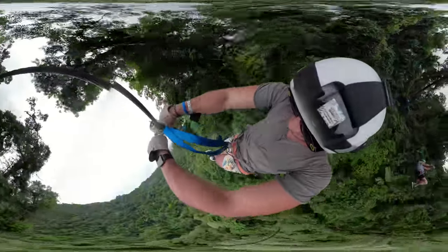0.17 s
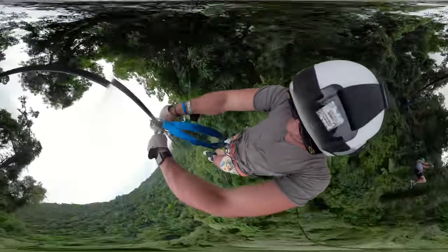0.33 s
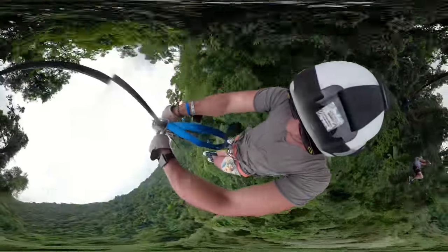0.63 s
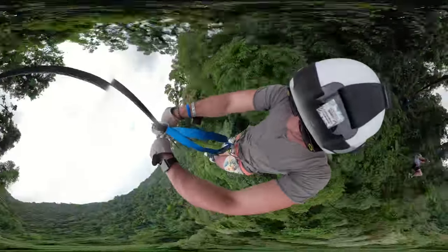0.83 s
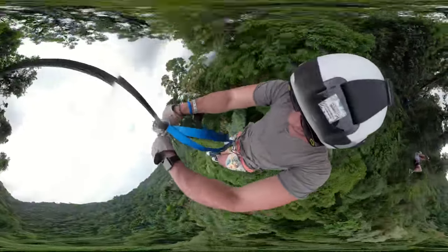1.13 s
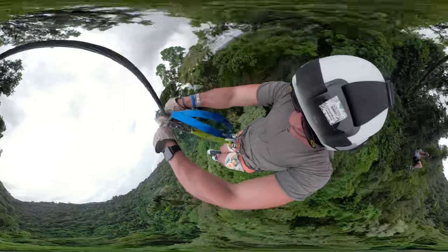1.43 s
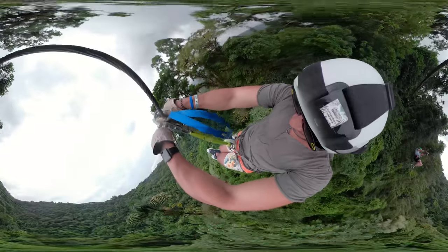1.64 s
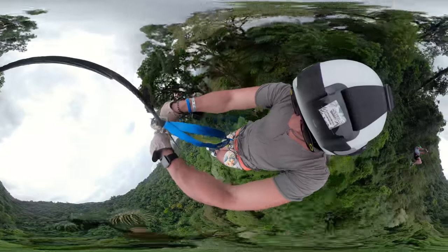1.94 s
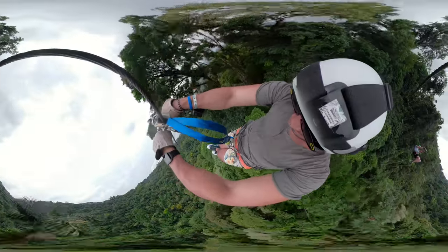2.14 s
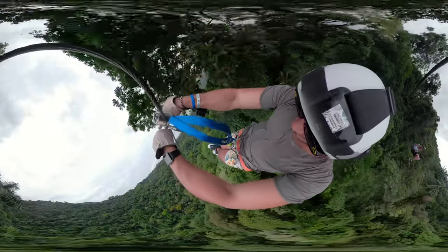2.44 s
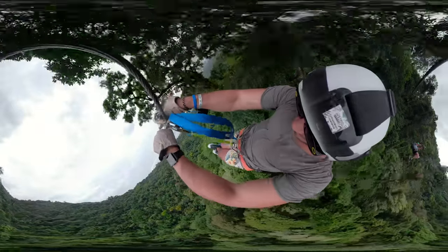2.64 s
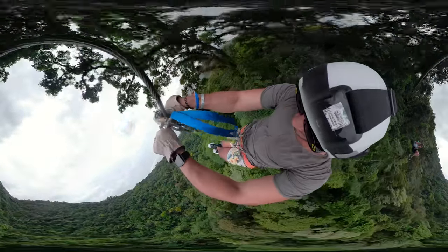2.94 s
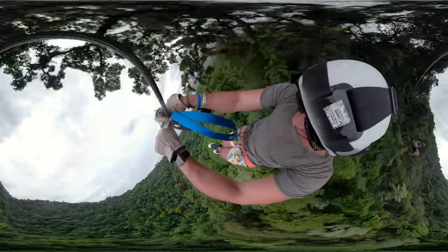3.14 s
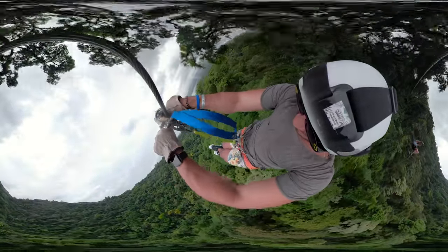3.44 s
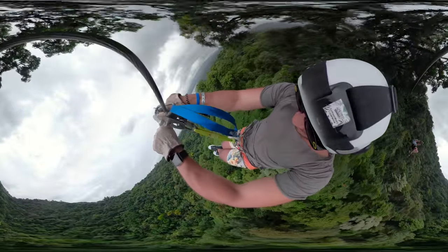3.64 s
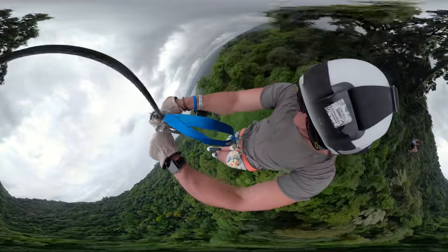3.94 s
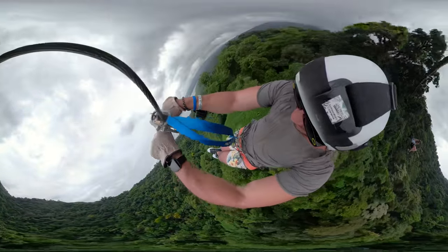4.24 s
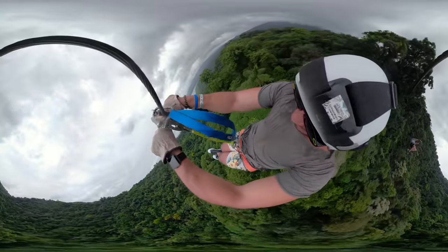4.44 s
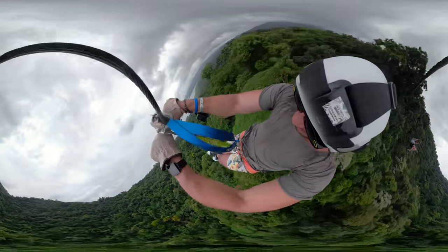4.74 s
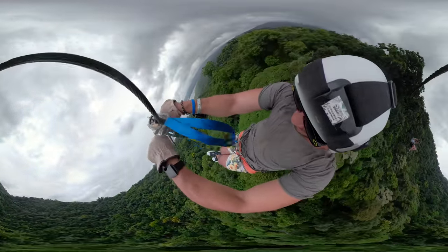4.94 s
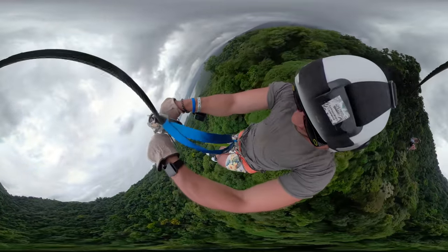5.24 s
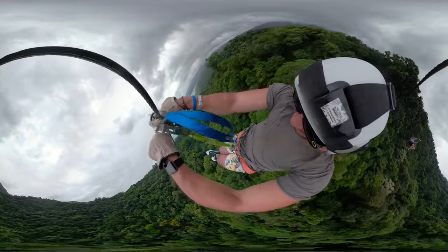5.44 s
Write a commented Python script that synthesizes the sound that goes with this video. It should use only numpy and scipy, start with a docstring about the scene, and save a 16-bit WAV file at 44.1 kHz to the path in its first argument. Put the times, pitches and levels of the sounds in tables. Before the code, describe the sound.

Wind dominates, low and rough, surging in irregular bursts with short popping buffets at the close, exposed microphone. Above it, quieter steel wheels sing on a cable in a grainy, high metallic whir whose tones swell and fade. The whir climbs and becomes a little cleaner and brighter, and a thin whine comes forward in the second half. Open air, no echo.

```python
"""Above a forest, a zip-line trolley gathers speed along a steel cable.
Its sheaves whirr in a rising comb of partials that swell as they cross the trolley's resonances.
Steel rubs with a bright hiss, the sheaves ring high and thin, and the cable's strands whine.
Shaped noise makes the rushing air that rumbles and buffets on the rider's microphone."""
import sys
import numpy as np
from scipy import signal
from scipy.fft import rfft, irfft, next_fast_len
from scipy.io import wavfile
from scipy.ndimage import uniform_filter1d

SR = 44100
rng = np.random.default_rng(int(sys.argv[2]) if len(sys.argv) > 2 else 0)


def digitize_waveform(pressure):
    """Quantize a signal to 16-bit integers and store it at the path in sys.argv[1].

    Rows of a 2-D input are taken as channels; values are limited to [-1, 1].
    """
    field = np.atleast_2d(pressure).T
    bounded = np.clip(field, -1, 1)
    quanta = np.round(bounded * 32767).astype(np.int16)
    wavfile.write(sys.argv[1], SR, quanta)


N = 246499
TIME = np.arange(N) / SR

# the ride, as twists of the cable passed: t/s, rate/Hz
TWIST_RATE = [(0, 95.3), (.8, 107.4), (1.6, 119.0), (2.4, 130.0), (3.2, 140.25), (4.0, 149.7), (4.8, 158.1),
              (5.6, 165.3)]
STRANDS = 6
# how hard the sheaves bear on the cable, as a gain on whirr and hiss: t/s, level/dB
CONTACT = [(0.0, -45), (0.55, -47), (1.1, -44), (1.76, -50), (1.95, -47), (2.47, -47.5), (2.75, -47.5),
           (3.32, -45), (3.62, -45.5), (4.44, -42.5), (4.68, -49.5), (4.7, -45.5), (4.73, -47.5),
           (5.18, -42.5), (5.5, -43.5), (5.55, -45)]

# how far the partials lie above multiples of the twist rate: t/s, offset/share of a step
COMB_OFFSET = [(0, .27), (1, .32), (3.05, .33), (3.3, .23), (4.2, .24), (5.6, .2)]
# stretches of cable that make a group of partials sing (bell widths, out to 1/e):
# t/s, half length/s, centre/partial number, half spread/partials, lift/dB, roughness/0-1
SWELLS = [(.1, 0.14, 21, 3.1, 9.5, 0), (0.11, 0.21, 43.2, 1.9, 2, 0.5), (0.573, 0.063, 29, .6, 11.5, 0),
          (0.794, 0.079, 28.3, 0.73, 9, .02), (0.72, 0.14, 34, 1.2, 7.5, 0.2),
          (0.85, 0.053, 26.2, .4, 8.5, 0), (1.17, 0.16, 25, 0.41, 8.5, 0.1),
          (1.37, 0.24, 26.6, 0.92, 12.5, 0.18), (1.3, 0.33, 21.5, 1.2, 12, 0.15),
          (1.03, 0.31, 49, 1.8, 7.5, 0.7), (1.39, 0.16, 29.4, 1.3, 9.5, 0.3),
          (1.72, 0.17, 32.8, 1.3, 9.5, 0.13), (1.98, 0.31, 19.6, 1.1, 14.5, .12),
          (2.43, .22, 35.7, 2.35, 14.5, 0.54), (2.36, .24, 15, .9, 14, .3),
          (2.655, 0.067, 21, .35, 17, 0.03), (2.8, 0.29, 17.8, 1.77, 16.5, 0.46),
          (2.9, 0.1, 34.3, 1.2, 14, 0.7), (3.006, 0.23, 20.1, 0.59, 14.5, 0),
          (3.19, 0.28, 21.3, 0.97, 10, 0.35), (3.552, .09, 31.9, 1.8, 11.5, .12),
          (3.8, 0.36, 23, 2.3, 5.5, 0.22), (3.854, .05, 19.1, .38, 12, .03),
          (4.197, 0.15, 28, 2.2, 13.5, 0.2), (4.42, .1, 24, 2.67, 6.5, 0.47),
          (4.58, 0.092, 29, 3.9, 12.5, 0.3), (4.7, 0.16, 32.4, 0.85, 9, 0.2),
          (5.285, 0.29, 25, 3.3, 9.5, 0.2), (4.86, 0.25, 23.5, 3.8, 6.5, 0.2)]
FLARE_HZ, FLARE_DB = 5.6, 2.07  # each partial flares and fades by itself: rate, spread
# trolley resonances: f/Hz, width/Hz, gain/dB, scrape gain/dB, gain/dB per doubling of speed
RESONANCES = [(2185, 1160, -12, 7.5, -13.5), (2878, 200, 7.5, -8.5, -11.5), (3088, 456, -2.5, 1.8, -5.5),
              (3580, 660, -2, -14, 0.5), (4365, 790, -1.5, 1.4, -8), (5780, 810, -5, 5, 4.5)]
# narrow rings of the side plates, excited by the scraping: f/Hz, width/Hz, gain/dB
PLATE_RINGS = [(2857, 130, -2.5), (3510, 290, 1.5)]

# colour of the rubbing: f/Hz, level/dB
HISS_COLOUR = [(700, -1.5), (1400, -5.5), (2500, -9), (4500, 3.5), (6300, -0.5), (6800, 0), (7300, -2.5),
               (8000, -6.5), (8750, -11.5), (9550, -10.5), (10000, -22.5), (10900, -21.5), (11800, -29.5),
               (14000, -39)]
HISS_DB, HISS_FLICKER_DB = 7.5, 1  # against the contact level; spread
# the sheave's high ringing: t/s, level/dB
RINGING = [(0.0, -49.5), (0.76, -62), (1.16, -56), (1.61, -77), (1.87, -53), (2.44, -48), (2.63, -51.5),
           (3.48, -47), (3.62, -60), (3.91, -48), (4.02, -60), (4.74, -72), (5.43, -62), (5.55, -59)]
# its modes: f/Hz, width/Hz, level/dB
SHEAVE_MODES = [(9420, 155, 1), (14570, 120, -24)]
# the strands' whine: t/s, level/dB
WHINE = [(0, -49.5), (.9, -55), (1.15, -43), (1.7, -54), (3.5, -60), (4.05, -42), (4.28, -42), (4.38, -48),
         (4.62, -42), (4.68, -51), (4.8, -39.5), (4.95, -47.5), (5.2, -44), (5.59, -46.5)]

# colours of the wind, from large eddies to fine spray, each: f/Hz, level/dB
SURGE_COLOUR = [(12, -21), (25, -4.5), (42, 3.5), (55, 3), (64, -16.5), (85, 8.5)]
RUMBLE_COLOUR = [(45, -23), (62, 2.5), (76, 0.5), (100, -1.5), (130, -5), (165, -12), (210, -19),
                 (300, -31.5), (500, -58)]
TURBULENCE_COLOUR = [(90, -18), (150, 0.5), (210, 3), (260, -4), (320, -6.5), (420, -12.5), (560, -21.5),
                     (800, -32.5), (1500, -48.5)]
SPRAY_COLOUR = [(300, -12), (550, -1.5), (750, -3.5), (1100, -5.5), (1600, -10.5), (3000, -12)]
# big, slow eddies (half length out to 1/e): t/s, half length/s, lift/dB
SURGES = [(.09, .05, 2), (.33, .08, 7), (.86, .09, 4), (1.04, 0.046, 2), (2, 0.043, -0.5), (2.28, .05, 0.5),
          (3.18, .05, 6.5), (3.42, 0.16, 3), (3.78, 0.12, -2)]
# gusts and lulls: t/s, half length/s, turbulence lift/dB, spray lift/dB
GUSTS = [(.44, 0.058, 3.5, 8.5), (.78, 0.049, 6, -2), (1.47, 0.2, 5, 7), (1.72, 0.058, 7.5, -5),
         (1.92, 0.027, -5, 2.5), (2.07, 0.013, 9.5, 11), (2.3, 0.079, 8, 5.5), (2.68, 0.12, 7, 2.5),
         (2.83, .06, -3.5, -10), (3.02, 0.064, 9.5, 4.5), (3.3, 0.17, 5.5, 4), (3.68, 0.14, 6.5, 8),
         (3.91, 0.045, -4.5, 2), (4.05, 0.027, 9.5, 7), (4.2, 0.036, 2, 7.5), (4.38, 0.096, 4, 3.5),
         (4.61, 0.097, 10, 6.5), (4.79, 0.062, -3.5, -4), (5.08, .06, 5, 1), (5.36, 0.038, 10.5, 5),
         (5.52, 0.09, 10.5, 8.5)]
FLUTTER_HZ, FLUTTER_DB = 13.7, 1.62  # quick unsteadiness of the flow: rate, spread
SURGE_DB, RUMBLE_YIELDS = -20.5, 0.53  # between surges; share of their lift the rumble loses
RUMBLE_DB, RUMBLE_FOLLOWS = -16.5, 0.23  # between gusts; share of the turbulence's lift
TURBULENCE_DB, FLOW_DB_PER_DOUBLING = -27.5, 1.5  # between gusts at mean speed; rise with speed
SPRAY_DB = -42  # between gusts at mean speed
# the hardest buffets, as strength of the kick: t/s, level/dB
BUFFETS = [(0.18, -16), (0.303, -9), (0.364, -18), (0.887, -12.5), (2.695, -6), (2.93, -14.5), (3.293, -11),
           (3.591, -11), (3.689, -8.5), (3.814, -10), (4.292, -22), (4.561, -14.5), (4.706, -7),
           (5.236, -22), (5.517, -16)]
# short flaps of air at the port, as strength of the kick: t/s, level/dB
FLAPS = [(0.582, -26.5), (0.837, -29), (1.184, -22), (1.441, -18), (1.534, -24.5), (1.696, -25)]
CUTOFF_HZ = 16000


def from_db(db):
    """Decibels to gain."""
    return 10 ** (np.asarray(db) / 20)


def rms_one(x):
    """Scale to rms 1."""
    return x / np.sqrt(np.mean(x ** 2) + 1e-20)


def noise():
    """White noise for the whole scene."""
    return rng.standard_normal(N)


def in_time(rows):
    """Each column of a curve, at every sample."""
    s, *columns = np.transpose(rows)
    return [np.interp(TIME, s, column) for column in columns]


def bell(x):
    """A bell curve of height 1."""
    return np.exp(-np.minimum(x ** 2, 40))


def lifts(events):
    """Bell-shaped changes of level in dB, one per event; a curve for each column of lifts."""
    s, length, *lifts_db = np.transpose(events)
    return np.array(lifts_db) @ bell((TIME - s[:, None]) / length[:, None])


def evened(x, seconds):
    """Hold the running rms near 1, leaving faster flutter."""
    size = max(int(seconds * SR), 8)
    power = uniform_filter1d(uniform_filter1d(x * x, size), size)
    return x / np.sqrt(np.maximum(power, 1e-20))


def drift(rate_hz):
    """Random wander with spread 1: low-passed noise, drawn at every 20th sample."""
    r = np.exp(-40 * np.pi * rate_hz / SR)
    draws = rng.standard_normal(N // 20 + 2002)
    slow = signal.lfilter([1], [1, -2 * r, r * r], draws)[2000:]  # skip the settling
    return np.interp(np.arange(N) / 20, np.arange(len(slow)), rms_one(slow))


def coloured(x, spectrum):
    """Filter a sound by a spectral curve; rms 1."""
    hz, level_db = np.transpose(spectrum)
    size = next_fast_len(N)
    bins = np.maximum(np.fft.rfftfreq(size, 1 / SR), 1)
    curve_db = np.interp(np.log(bins), np.log(hz), level_db, left=-90, right=-90)
    return rms_one(irfft(rfft(x, size) * from_db(curve_db), size)[:N])


def resonate(x, hz, width_hz):
    """A steep-sided resonance."""
    edges = [hz - width_hz / 2, hz + width_hz / 2]
    return signal.sosfilt(signal.butter(2, edges, "band", fs=SR, output="sos"), x)


def sheave_comb(turns, blur_hz, steady, rough, wobble):
    """Rolling contact repeats with every twist: a comb of partials, each a narrow core in a noisy skirt."""
    offset, = in_time(COMB_OFFSET)
    shift = np.cumsum(offset * np.gradient(turns))
    turns = turns + wobble * drift(1.8)
    s, length, centre, spread, lift_db, roughness = np.transpose(SWELLS)
    roughness = np.clip(roughness, 0, 1)
    swelling = bell((TIME - s[:, None]) / length[:, None])
    out = np.zeros(N)
    for k in range(13, 54):
        power = from_db(lift_db) ** 2 * bell((k - centre) / spread)
        core = np.sqrt(0.23 + (power * (1 - roughness)) @ swelling)
        skirt = np.sqrt(rough + (power * roughness) @ swelling)
        angle = 2 * np.pi * (k * turns + shift + rng.random())
        # the harder a partial sings, the steadier it holds
        grip = steady * np.sqrt(core)
        flare = from_db(FLARE_DB * drift(FLARE_HZ))
        tone = (grip + drift(blur_hz)) * np.cos(angle) + drift(blur_hz) * np.sin(angle)
        tone = tone / np.sqrt(grip ** 2 + 2)
        out += np.sqrt(2) * (core * flare * tone + skirt * drift(120) * np.sin(angle))
    return out


def trolley(turns, rate):
    """Comb and scrape sound through resonances; with speed the whirr turns cleaner and brighter."""
    pace = rate / rate.mean()
    comb = sheave_comb(turns, blur_hz=12.8, steady=1.76, rough=0.12, wobble=0.00087)
    # the strands' third harmonic, fading in with speed
    strand_phase = 2 * np.pi * 3 * STRANDS * turns + drift(35)
    comb = comb + from_db(-7) * pace ** 6 * np.sin(strand_phase)
    scrape = 10 * noise() * pace ** -1.2
    scrape = scrape + sum(from_db(ring_db) * resonate(scrape, hz, width_hz)
                          for hz, width_hz, ring_db in PLATE_RINGS)
    out = np.zeros(N)
    for k, (hz, width_hz, gain_db, scrape_db, speed_db) in enumerate(RESONANCES):
        gain = from_db(gain_db + speed_db * np.log2(pace))
        sign = (-1) ** k  # neighbours in opposite polarity
        out += sign * gain * resonate(comb + from_db(scrape_db) * scrape, hz, width_hz)
    return out


def friction():
    """Steel rubbing on steel: a bright, slightly flickering hiss of coloured noise."""
    return from_db(HISS_DB + HISS_FLICKER_DB * drift(30)) * coloured(noise(), HISS_COLOUR)


def sheave_ring():
    """The rubbing keeps the sheave's thin, high modes ringing: noise through narrow resonances."""
    level_db, = in_time(RINGING)
    modes = sum(from_db(db) * evened(resonate(noise(), hz, width_hz), .06)
                for hz, width_hz, db in SHEAVE_MODES)
    return from_db(level_db) * modes


def whine(turns):
    """Strands pass under the sheave as a thin tone, strongest an octave above their rate."""
    level_db, = in_time(WHINE)
    phase = 2 * np.pi * STRANDS * turns + .1 * drift(18)
    waver_db = 1.3 * drift(20)
    tone = np.sqrt(2) * (np.sin(2 * phase) + from_db(-9.5) * np.sin(phase))
    return from_db(level_db + waver_db) * tone


def wind(rate):
    """Large eddies surge and rumble; fine turbulence bursts on the rumble's strongest swings."""
    flow_db = FLOW_DB_PER_DOUBLING * np.log2(rate / rate.mean()) + FLUTTER_DB * drift(FLUTTER_HZ)
    gust_db, spray_db = lifts(GUSTS) + flow_db
    surge_db, = lifts(SURGES)
    surge = evened(coloured(noise(), SURGE_COLOUR), 0.036)
    eddies = evened(coloured(noise(), RUMBLE_COLOUR), 0.036)
    bursts = from_db(3.35 * np.abs(eddies) + 3.0 * drift(42))
    # sharp kinks of pressure, about 450 a second, over a steady rush
    kinks = rms_one(noise() * (rng.random(N) < 450 / SR))
    gusts = bursts * (kinks + 0.93 * noise())
    turbulence = evened(coloured(gusts, TURBULENCE_COLOUR), 0.056)
    spray = evened(coloured(gusts, SPRAY_COLOUR), 0.12)
    rumble_db = RUMBLE_DB + RUMBLE_FOLLOWS * gust_db - RUMBLE_YIELDS * surge_db
    large = from_db(SURGE_DB + surge_db) * surge + from_db(rumble_db) * eddies
    fine = from_db(TURBULENCE_DB + gust_db) * turbulence + from_db(SPRAY_DB + spray_db) * spray
    return large + fine


def kicks_at(events):
    """One click of the given height per event."""
    kicks = np.full(N, 1e-18)
    for s, level_db in events:
        kicks[int(s * SR)] = from_db(level_db)
    return kicks


def puffs(kicks, hz, width_hz, decay_s):
    """Each kick lets a brief, dull puff of air into the port: decaying noise through a resonance."""
    fade = signal.lfilter([1], [1, -np.exp(-1 / (decay_s * SR))], kicks)
    # make up the level lost to the narrow band
    air = resonate(fade * noise(), hz, width_hz) * np.sqrt(SR / 2 / width_hz)
    return signal.sosfilt(signal.butter(2, 3500, fs=SR, output="sos"), air)


def buffets(rise_hz, fall_hz, spray_db):
    """An eddy breaks on the port: a sharp dip of pressure and a short puff."""
    kicks = kicks_at(BUFFETS)
    dip = signal.sosfilt(signal.butter(1, [fall_hz, rise_hz], "band", fs=SR, output="sos"), kicks)
    dip = signal.sosfilt(signal.butter(2, 1200, fs=SR, output="sos"), dip)
    # the deepest dip takes the height of the hardest kick
    dip = -kicks.max() * dip / np.abs(dip).max()
    return dip + from_db(spray_db) * puffs(kicks, hz=720, width_hz=1360, decay_s=0.0029)


def flaps():
    """Small, fast eddies give brighter puffs."""
    return puffs(kicks_at(FLAPS), hz=1460, width_hz=1070, decay_s=0.0022)


def scene():
    """The trolley overhead and the wind at the microphone."""
    rate, = in_time(TWIST_RATE)
    contact_db, = in_time(CONTACT)
    turns = np.cumsum(rate) / SR
    rolling = from_db(contact_db) * (trolley(turns, rate) + friction())
    steel = rolling + sheave_ring() + whine(turns)
    air = wind(rate) + buffets(rise_hz=267, fall_hz=90, spray_db=-21.5) + flaps()
    # the strongest swings of pressure are rounded off
    air = air / (1 + (air / .85) ** 4) ** (1 / 4)
    return (steel + air)[None]


def record(dry):
    """A steep low-pass cuts the top."""
    return signal.sosfilt(signal.cheby2(12, 70, CUTOFF_HZ, fs=SR, output="sos"), dry)


dry = scene()
out = record(dry)
digitize_waveform(out)
```